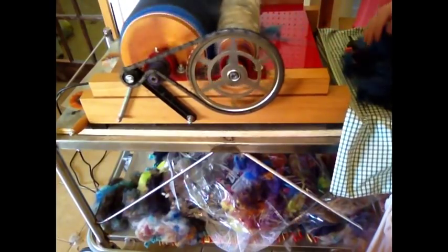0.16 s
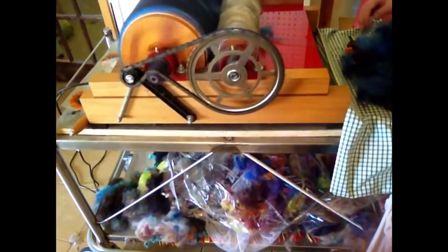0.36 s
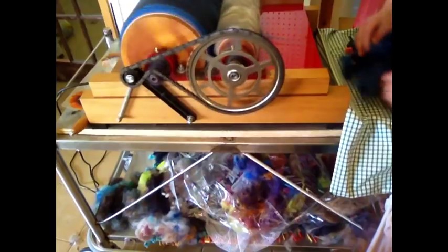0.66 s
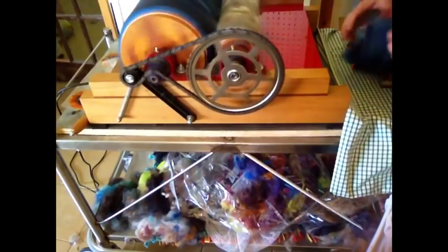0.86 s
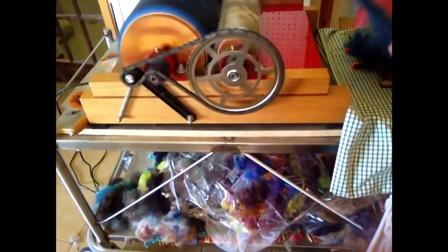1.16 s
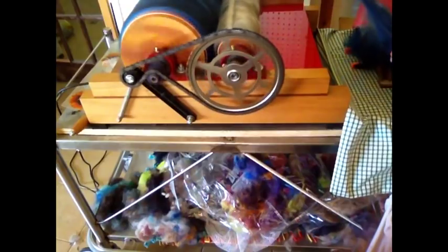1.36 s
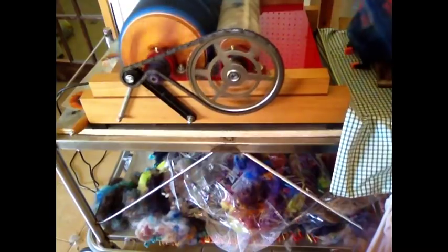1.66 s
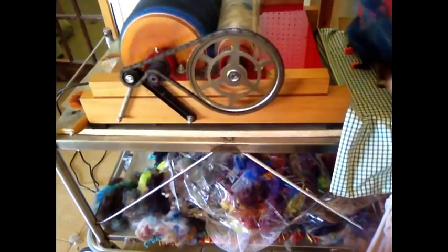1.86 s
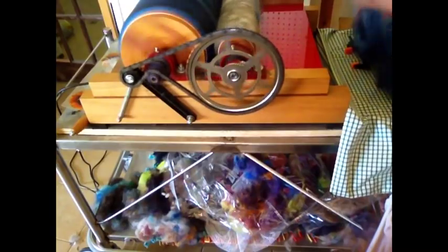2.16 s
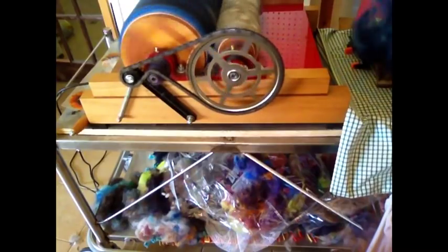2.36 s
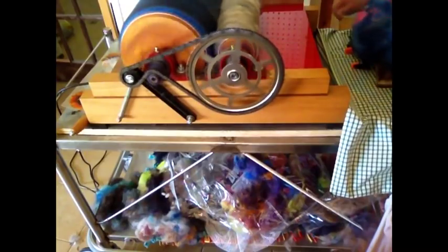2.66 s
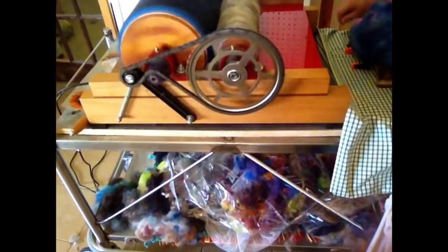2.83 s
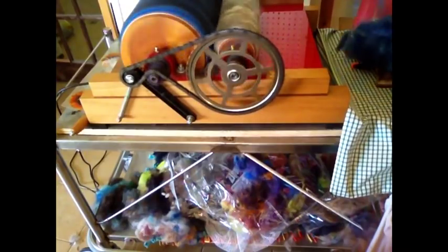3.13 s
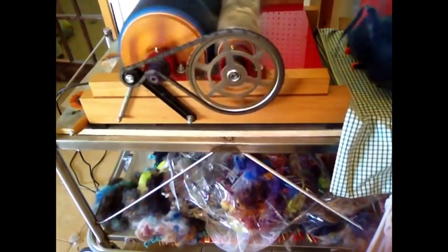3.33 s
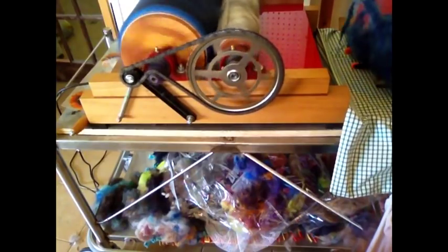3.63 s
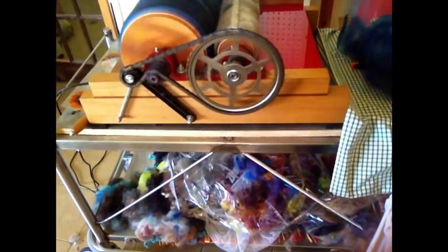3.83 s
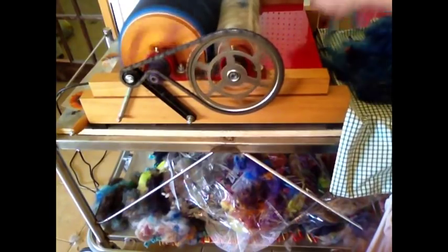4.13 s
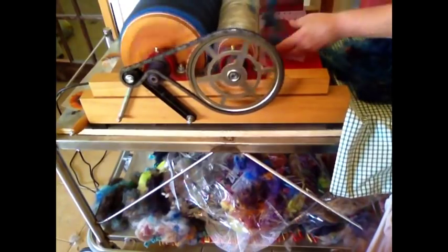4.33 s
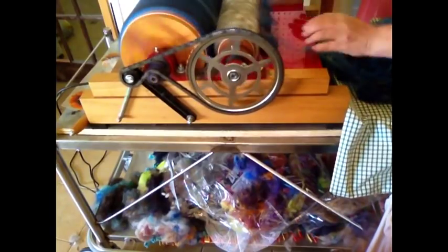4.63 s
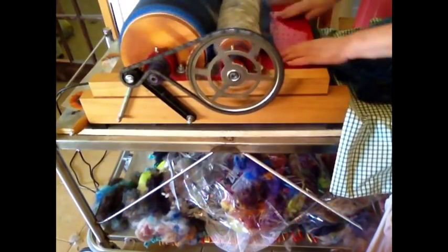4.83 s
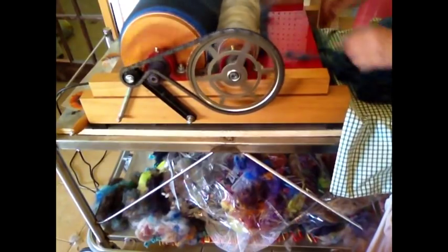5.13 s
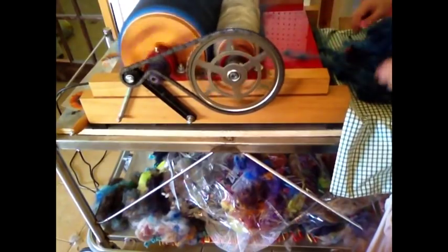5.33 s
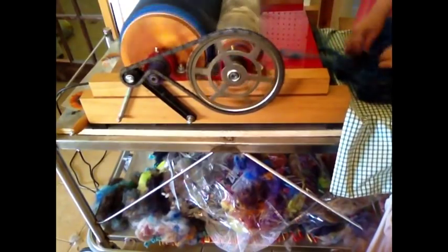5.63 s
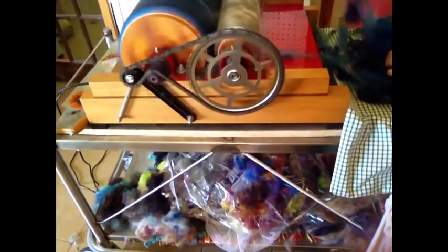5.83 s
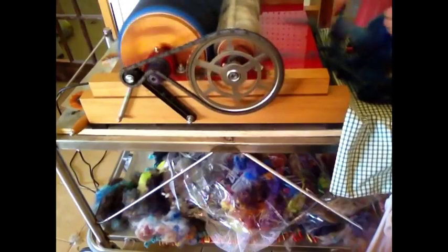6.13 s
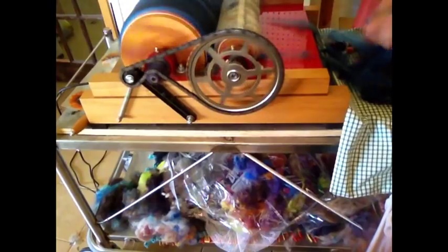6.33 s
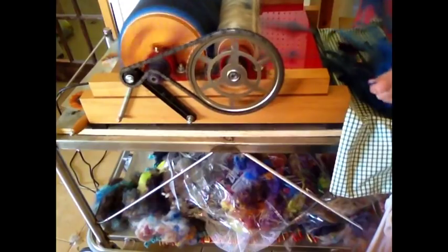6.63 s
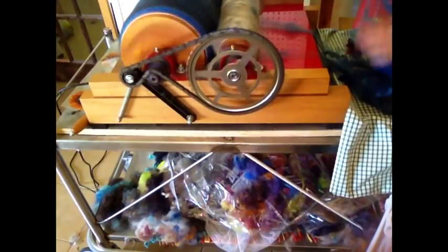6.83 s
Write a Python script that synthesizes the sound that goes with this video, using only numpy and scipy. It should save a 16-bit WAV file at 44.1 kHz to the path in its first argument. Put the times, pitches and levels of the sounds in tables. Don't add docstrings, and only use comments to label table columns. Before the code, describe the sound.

Continuous nasal motor hum with rough brushing of wire teeth and a busy, dry metallic chain rattle. First comes fibre dragged on wood with a hard knock on the table, then several seconds of uneven clunks, slaps and regular crisp ticks. Near the end a short tearing snap, two clusters of wooden bumps and gritty strokes. Close small microphone, short indoor reflections, little bass.

```python
import sys
import numpy as np
from scipy import signal
from scipy.io import wavfile
from scipy.ndimage import uniform_filter1d

SR = 44100
rng = np.random.default_rng(int(sys.argv[2]) if len(sys.argv) > 2 else 0)


def undo_db(level):
    steps = np.asarray(level, float) / 20
    return 10 ** steps


def generate_wav(sig):
    pcm = np.round(np.clip(np.atleast_2d(sig).T, -1, 1) * 32767).astype(np.int16)
    wavfile.write(sys.argv[1], SR, pcm)


N = 307818

TEETH = 8
# (time [s], tooth before [dB], tight tooth [dB], tooth after [dB])
SPROCKET_TURNS = [(0.1116, -37.5, -41.5, -78), (0.5483, -72, -37, -70), (0.9628, -70, -38, -64.5),
                  (1.387, -79, -32.5, -50), (1.803, -72, -52, -50.5), (2.2174, -70, -38, -45),
                  (2.6295, -70, -43, -39.5), (3.041, -52, -43.5, -45.5), (3.456, -72, -34.5, -43),
                  (3.8653, -47, -43, -37), (4.278, -50, -43, -44), (4.6916, -51, -37, -46),
                  (5.1022, -51, -37, -53), (5.5154, -70, -39.5, -48), (5.927, -56, -38.5, -42),
                  (6.3593, -70, -37, -42), (6.7995, -68, -40.5, -51)]


def read(points, hz):
    f, value = np.transpose(points)
    return np.interp(np.log(hz + 1), np.log(f + 1), value)


def evened(x):
    return x / np.sqrt(np.mean(x ** 2) + 1e-20)


def drift(rate_hz):
    t = np.arange(0, N + 256, 256) / SR
    rates = rate_hz * np.geomspace(.05, 1, num=24)
    waves = sum(np.sin(2 * np.pi * (f * t + rng.random())) / np.sqrt(f) for f in rates)
    return np.interp(np.arange(N) / SR, t, evened(waves))


def ring(x, hz, width):
    r = np.exp(-np.pi * width / SR)
    return 2 * signal.lfilter([1 - r], [1, -r * np.exp(2j * np.pi * hz / SR)], x).real


def resonate(x, hz, width):
    turn = np.exp(2j * np.pi * np.cumsum(hz * np.ones(len(x))) / SR)
    r = np.exp(-np.pi * width / SR)
    return 2 * (turn * signal.lfilter([1 - r], [1, -r], x / turn + 1e-18)).real


def band(x, lo_hz, hi_hz):
    return evened(signal.sosfilt(signal.butter(2, [lo_hz, hi_hz], "band", fs=SR, output="sos"), x))


def struck(rows, share, modes, rattle_s, rough=1):
    s, db, rel_db = np.transpose(rows)
    blows = np.zeros(N)
    blows[(s * SR).astype(int)] = undo_db(db + share * rel_db)
    fade = np.exp(-np.arange(2000) / (rattle_s * SR))
    rattle = signal.oaconvolve(blows, fade / np.linalg.norm(fade))[:N] * rng.standard_normal(N)
    contact = (1 - rough) * blows + rough * rattle
    out = np.zeros(N)
    for hz, width, db in modes:
        rung = ring(ring(contact, hz, width), hz, 3 * width)
        out += undo_db(db) * rung * SR / (2 * np.pi * width)
    return out


def room(x):
    # (frequency [Hz], t60 [s])
    decay = [(200, 0.34), (1500, 0.11), (12000, 0.19)]
    out = np.zeros(N)
    turn = 2 * np.pi * 1.3 * np.arange(N) / SR
    for k in range(3):
        taps = np.zeros(SR // 2)
        at = np.arange(200, len(taps) - 20, 20)
        taps[at + rng.integers(0, 20, len(at))] = rng.choice([-1., 1.], len(at))
        hz, t, z = signal.stft(taps, SR, nperseg=256)
        tail = signal.istft(z * undo_db(-60 * t / read(decay, hz)[:, None]), SR, nperseg=256)[1]
        share = np.sqrt(2 / 3) * np.cos(turn + k * np.pi / 3)
        out += signal.fftconvolve(x * share, tail / np.linalg.norm(tail))[:N]
    return out


def motor():
    mains_hz, shaft_hz = 120.04, 28.87
    tones = [(0, 3), (0, 4), (1, 0), (0, 5), (1, 1), (0, 6), (1, 2), (0, 7), (1, 3), (2, 0), (0, 9), (2, 1),
             (0, 10), (0, 11), (2, 4), (3, 0), (3, 1), (4, 0), (5, 0), (6, 0)]
    tones_db = [-107, -82, -70.5, -72.5, -71, -64.5, -68.5, -101, -63, -50, -62, -64, -68, -60.5, -57.5,
                -57, -60, -99, -53.5, -71.5]
    frame_hz = [175, 205, 238, 266, 314, 353, 395, 425, 500, 600, 965, 1066, 1203, 1378, 1545, 1790]
    # (width [Hz], level [dB])
    frame = [(10.3, -72), (9.7, -69), (20.5, -56.5), (13.5, -56.5), (14.9, -70), (16.9, -64.5),
             (16.3, -54.5), (26, -72.5), (62, -68), (51, -58), (49, -63.5), (37.5, -63.5), (53.5, -60),
             (25, -85), (37.4, -64), (72.5, -61)]
    # (time [s], level [dB])
    upper_swell = [(0, -11), (.15, -2), (.4, -6), (.7, -2), (1.2, 2.5), (2.6, 1), (3.3, -0.5), (4.3, 0.5),
                   (4.95, 2.5), (5.45, 2.5), (5.8, -1.5), (6.1, -1), (6.25, -9), (6.45, 1), (6.65, -2), (6.98, -1)]
    t = np.arange(N) / SR
    shaft = np.cumsum(shaft_hz * (1 + .0006 * drift(2))) / SR
    upper_swell_db = np.interp(t, *np.transpose(upper_swell))
    out = np.zeros(N)
    for (m, k), db in zip(tones, tones_db):
        turns = m * mains_hz * t + k * shaft + rng.random()
        waver = drift(22)
        if m > 2:
            sway_db = upper_swell_db + (3.5 if m == 3 else 1.8) * waver
        else:
            sway_db = .8 * waver
        out += np.sqrt(2) * undo_db(db + sway_db) * np.sin(2 * np.pi * turns)
    shake = rng.standard_normal(N) * (1 + .3 * np.cos(2 * np.pi * shaft))
    for hz, (width, db) in zip(frame_hz, frame):
        out += undo_db(db + 2.0 * drift(8.3)) * evened(ring(ring(shake, hz, width), hz, 3 * width))
    return out


def whirr():
    # (frequency [Hz], level [dB per Hz])
    spectrum = [(20, -70), (100, -39), (180, -23.5), (400, -4), (640, -12), (700, -15.5), (950, -15),
                (1800, -14.5), (2400, -18.5), (3000, -25.5), (5000, -29.5), (12000, -33), (13200, -33.5),
                (15500, -36)]
    # (frequency [Hz], depth [dB])
    catch = [(500, 0), (900, 2.3), (2500, 2.3), (5000, .6)]
    frames, hz = N // 128 + 5, np.fft.rfftfreq(512, 1 / SR)
    a, b, patches = rng.standard_normal((frames, 257, 3)).T
    patches = uniform_filter1d(patches, size=8, axis=0)
    patches = evened(uniform_filter1d(patches, size=7, axis=1))
    gaps = evened(uniform_filter1d(patches[:40].mean(axis=0), size=3))
    db = read(spectrum, hz)[:, None] + .9 * patches + read(catch, hz)[:, None] * gaps
    noise = signal.istft((a + 1j * b) * undo_db(db), nperseg=512, noverlap=384)[1][:N]
    return undo_db(-51 + 1.1 * drift(1.78)) * evened(noise)


def rollers():
    link_hz = 19.395
    # (share of a link pitch, level [dB])
    landings = [(.1, 0), (.44, -4), (.7, 0)]
    # (frequency [Hz], width [Hz], level [dB])
    casing = [(965, 140, -3), (1200, 250, -1), (1380, 90, -5), (1550, 220, -1), (1790, 200, 0),
              (2280, 250, -4), (3470, 300, -11)]
    # (time [s], level [dB])
    tension = [(1.1, -48), (1.66, -50), (1.93, -62), (2.79, -52.5), (3.34, -47), (3.72, -54), (3.99, -45),
               (4.28, -46), (4.43, -66), (4.62, -51), (4.74, -61), (5.02, -46), (5.15, -56), (5.86, -44),
               (6.0, -61)]
    link = np.arange(int(N / SR * link_hz) - 1)[:, None]
    place, db = np.transpose(landings)
    late, luck = rng.standard_normal((len(link), len(landings), 2)).T
    seated_s = (link + place + .02 * late.T) / link_hz
    seated_db = db + 4 * np.minimum(luck.T, 1.3)
    loose_s = rng.uniform(0, N / SR - .01, 900)
    loose_db = -16 + 4.5 * np.minimum(rng.exponential(1, 900), 3.5)
    s = np.r_[seated_s.ravel(), loose_s]
    rows = np.c_[s, np.r_[seated_db.ravel(), loose_db], np.zeros(len(s))]
    taps = struck(rows, 0, casing, .0015, .6)
    return undo_db(-9.0 + np.interp(np.arange(N) / SR, *np.transpose(tension))) * evened(taps)


def slaps():
    # (time [s], peak level [dB], ring [Hz])
    hits = [(1.105, -39, 1180), (1.287, -31.5, 1530), (1.49, -35, 1060), (1.632, -39, 1380),
            (1.91, -36, 1190), (1.995, -36, 1060), (2.096, -53, 900), (2.115, -33.5, 1080),
            (2.407, -43, 950), (2.457, -36, 920), (2.529, -33.5, 1540), (2.869, -36, 965), (2.92, -36, 990),
            (5.363, -33, 934), (2.94, -32.5, 1030), (2.993, -34.5, 1470), (3.046, -36, 1340),
            (3.091, -49, 1870), (3.149, -39, 1920), (3.178, -34, 974), (3.23, -40, 1780),
            (3.283, -37.5, 970), (3.56, -33.5, 1550), (3.593, -38.5, 980), (3.642, -37, 990),
            (3.799, -33.5, 990), (4.111, -35, 1010), (4.588, -33, 1060), (4.642, -35.5, 1550),
            (4.695, -39, 1100), (4.934, -45, 1480), (5.001, -31.5, 1430), (5.059, -33, 1580),
            (5.238, -47, 895), (5.394, -33, 1060), (5.701, -48, 1780), (5.828, -32.5, 1510),
            (0.694, -35, 927), (4.777, -34, 930), (6.808, -33.5, 1535), (6.855, -34, 1190),
            (6.856, -41, 1810), (6.908, -34, 1930), (6.943, -35, 980), (6.58, -35, 1460),
            (6.585, -47, 2250)]
    t60 = 0.038
    out, t = np.zeros(N + SR), np.arange(3000) / SR
    for s, db, hz in hits:
        grit = band(rng.standard_normal(len(t)), 700, 1950)
        neighbour = np.sin(2 * np.pi * 1.37 * hz * t) * undo_db(-60 * t / t60)
        tone = np.sin(2 * np.pi * hz * t) + .5 * neighbour
        swell = undo_db(db - 4 - 60 * t / t60) * (1 - np.exp(-t / 0.00079))
        out[round(s * SR):][:len(t)] += swell * (tone + 0.67 * grit)
    return out[:N]


def links():
    seat = .67
    s = np.transpose(SPROCKET_TURNS)[0]
    at = np.interp(np.arange(TEETH * (len(s) - 1)) + seat, TEETH * np.arange(len(s)), s)
    late, luck, low = rng.standard_normal((len(at), 3)).T
    return np.c_[at + .0015 * late, -43.5 + 3.5 * luck, -1.5 + 3 * low]


def teeth():
    # (time [s], level [dB])
    jolt = (.5796, -26)
    s, *db = np.transpose(SPROCKET_TURNS)
    pitch_s = np.gradient(s) / TEETH
    at = np.r_[s - pitch_s, s, s + .96 * pitch_s, jolt[0]]
    db = np.r_[np.ravel(db), jolt[1]]
    return np.c_[at, db, -10 - 0.46 * (db + 38)]


def chain():
    # (time [s], peak level [dB], share of the lower ring [dB])
    hard_ticks = [(.166, -39, -6), (.5502, -27, 0), (.612, -32, 12), (1.106, -32, -15), (1.1573, -33, 2),
                  (1.2103, -31.5, -6), (1.705, -39.5, 14), (1.8033, -37, -8), (2.357, -40.5, 9),
                  (2.5265, -39, 15), (2.6638, -42, -13), (2.716, -39, 10), (2.8689, -41, -20),
                  (3.3518, -35.5, 10.5), (3.698, -35, -13), (3.7475, -32, 1), (3.9042, -47.5, 16),
                  (4.1091, -37, -2), (4.6215, -37, 1), (4.7262, -38, 3), (4.777, -40, 4), (5.002, -36, 2),
                  (5.24, -33.5, -20), (5.3408, -35.5, -7), (5.7526, -30, -7), (6.092, -32, -4),
                  (6.137, -40, -12), (6.1447, -25, -8), (6.181, -30, -1), (6.789, -35, 4)]
    # (time [s], peak level [dB], share of the lower ring [dB])
    light_ticks = [(1.3159, -51, -1), (1.6841, -43.5, -1), (1.7365, -43, -1), (2.1534, -42.5, 12),
                   (2.2543, -50, -4), (2.4076, -52, 17), (2.7676, -44, -4), (2.9724, -40, -1),
                   (3.1787, -44, 13), (3.2301, -44, -6), (3.3333, -60, -2), (3.5604, -48, -4),
                   (3.6436, -63, -4), (3.7993, -68, -2), (4.213, -43, 2), (4.4687, -55, -4),
                   (4.5211, -46, -6), (4.5725, -43, -9), (4.8279, -46, 6), (4.9831, -62, -4),
                   (5.0878, -56, -1), (5.291, -56, -7), (5.4465, -48, 1.5), (5.6496, -59, -4),
                   (5.8048, -42, -1), (5.8591, -41, 8), (5.9105, -47, -2), (5.9614, -47, -2),
                   (6.013, -39, 2), (6.2906, -38, -4), (6.346, -51, -4)]
    # (time [s], peak level [dB], share of the table [dB])
    shaft_knocks = [
        (1.233, -37.5, 1),
        (1.759, -34, -3),
        (2.276, -34, 1),
        (2.79, -42, 4),
        (3.303, -40, 5.5),
        (3.821, -32, -1),
        (4.336, -33.5, -3.5),
        (4.851, -32.5, -4),
        (5.363, -40, 4.5),
        (5.881, -32.5, 2),
    ]
    # (time [s], peak level [dB])
    clunks = [(1.288, -54), (1.527, -42.5), (1.996, -40), (2.097, -46), (2.15, -41.5), (2.51, -39),
              (2.868, -51), (2.922, -34), (2.991, -46), (3.129, -41), (3.179, -59), (3.403, -42.5),
              (3.642, -56), (4.005, -39.5), (4.212, -41), (4.417, -44), (4.508, -41), (4.573, -56),
              (5.053, -41), (5.187, -39.5), (5.649, -40), (5.826, -41), (5.86, -46)]
    # (frequency [Hz], width [Hz], level [dB])
    tick_high = [(2300, 500, -1), (2850, 600, -1), (3480, 310, -2.5), (3950, 500, -6), (4600, 900, -12),
                 (6300, 2500, -17)]
    # (frequency [Hz], width [Hz], level [dB])
    tick_low = [(1380, 200, -3), (1790, 250, 0), (2250, 300, -3)]
    # (frequency [Hz], width [Hz], level [dB])
    knock_ring = [(960, 90, 0), (1150, 250, -7), (1100, 1100, 1)]
    # (frequency [Hz], width [Hz], level [dB])
    knock_table = [(390, 100, -1), (500, 160, -3)]
    blows = np.r_[shaft_knocks, np.c_[clunks, np.zeros(len(clunks))]]
    snap_ticks = teeth()[:-1] * [1, 1, 0] + [0, -3.5, 5]
    seats = np.r_[hard_ticks, np.add(light_ticks, [0, 3, 0]), links(), snap_ticks]
    jarred = np.r_[seats, blows * [1, 1, 0] + [0, -1, 0]]
    ticks = undo_db(-1) * struck(seats, 0, tick_high, .004, .4)
    ticks += undo_db(-3) * struck(jarred, 1, tick_low, .004, .4)
    knocks = undo_db(4.5) * struck(blows, 0, knock_ring, .001, .15)
    knocks += undo_db(5) * struck(blows, 1, knock_table, .001, .15)
    knocks = signal.sosfilt(signal.butter(2, 2000, fs=SR, output="sos"), knocks)
    return ticks - knocks + slaps() + rollers()


def sprocket():
    # (frequency [Hz], width [Hz], level [dB])
    snap_high = [(11140, 770, -6), (11700, 380, -1), (12030, 400, -8), (12380, 310, -3), (13900, 900, -24)]
    # (frequency [Hz], width [Hz], level [dB])
    snap_mid = [(2700, 900, -9), (3700, 1000, -7), (4600, 1200, -4), (5600, 1200, -2), (6470, 1000, -4),
                (7700, 1500, 0), (9000, 1500, -1)]
    rows = teeth()
    fizz = undo_db(3.5) * struck(rows, 0, snap_high, 0.0082, 0.86)
    return fizz + undo_db(12.5) * struck(rows, 0.94, snap_mid, 0.012, 0.93)


def wool():
    # (peak time [s], level [dB], rise [s], fall [dB per s], scrape resonance [Hz])
    drags = [(.21, -41, 0.44, 96, 1280), (.4, -40.5, 0.018, 20, 1150), (.464, -33.5, 0.057, 64, 1200),
             (0.563, -35.5, 0.1, 90, 1620), (0.779, -37, 0.032, 147, 1520), (.87, -41.5, 0.27, 44, 1500),
             (.965, -40, 0.012, 90, 1410), (1.03, -43, .05, 80, 1450), (1.276, -47.5, 0.061, 34, 1390),
             (1.864, -48, 1, 604, 1340), (3.364, -46, 0.034, 45, 1190), (6.04, -41.5, 0.028, 70, 1400),
             (6.15, -36, 0.02, 98, 1570), (6.2, -38, 0.13, 122, 1410), (6.42, -43.5, 0.57, -1, 1470),
             (6.57, -42.5, 0.17, 90, 1550), (6.684, -39, .006, 40, 1480), (6.84, -47, 0.11, 110, 1500)]
    # (middle time [s], level [dB], half length [s])
    brushes = [(0.183, -61, 0.16), (0.472, -62, 0.08), (0.555, -49, .015), (0.622, -51, 0.028),
               (0.805, -59.5, 0.065), (0.997, -67, 0.09), (1.414, -64.5, 0.5), (3.4, -80, .1),
               (6.08, -75, .05), (6.14, -64, 0.0089), (6.202, -61, 0.033), (6.49, -61, 0.11),
               (6.772, -66, 0.077)]
    # (time [s], level [dB], centre [Hz])
    tuft = [
        [(5.7, -66, 4560), (5.722, -57, 4600), (5.73, -45, 4550)],
        [(5.73, -54, 4700), (5.78, -57, 5160), (5.785, -59, 4920)],
    ]
    # (time [s], level [dB], unused share [dB])
    tuft_snap = [
        (5.7743, -33.5, 0),
    ]
    t = np.arange(N) / SR
    s, peak_db, rise_s, fall_db, stroke_hz = np.transpose(drags)[:, :, None]
    strokes = peak_db + np.minimum(11.5 * (t - s) / rise_s, fall_db * (s - t))
    lift_db = 5.5 * np.clip((t - 6.8) / 0.073, 0, 1)
    drag_db = strokes.max(axis=0) - lift_db
    scrape_hz = uniform_filter1d(stroke_hz[strokes.argmax(axis=0), 0], size=1500)

    grain = evened(uniform_filter1d(rng.standard_normal(N), size=130))
    slips = rng.standard_normal(N) * undo_db(1.8 * grain)
    squeal = evened(resonate(slips, scrape_hz, 120)) + 0.3 * evened(ring(slips, 2050, 134))
    body = 1.05 * evened(resonate(slips, scrape_hz, 470)) + 1.18 * band(slips, 770, 1760)
    scrape = evened(0.41 * squeal + body)
    rumble = undo_db(-10.5) * band(slips, 434, 860)
    swells = sum(undo_db(db) * np.exp(-((t - at) / half) ** 2) for at, db, half in brushes)
    hiss = swells * band(slips, 800, 11000)

    s, db, hz = np.vstack(tuft).T
    centre_hz = np.interp(t, s, hz)
    pull = evened(resonate(band(rng.standard_normal(N), 4100, 5400), centre_hz, 1300))
    pull += 0.42 * band(slips, 5800, 7800)
    tearing = undo_db(np.interp(t, s, db, -120, -120)) * pull
    snap_modes = [(6900, 690, 3.0), (5900, 700, -4), (4600, 800, -6)]  # Hz, width Hz, dB
    snap = struck(tuft_snap, 0, snap_modes, 0.0014)
    return undo_db(drag_db) * (scrape + rumble) + hiss + tearing + snap


def bumps():
    # (time [s], peak level [dB], low ring [Hz], share of the high ring [dB], high ring [Hz])
    hits = [(0.5486, -15.5, 368, -11, 1570), (.554, -20, 385, -9, 920), (0.569, -23, 333, -26, 1070),
            (.576, -22, 368, -18, 1100), (0.611, -32, 333, -6, 970), (.632, -32.5, 290, -20, 1200),
            (4.021, -31.5, 278, -29, 1130), (6.13, -18.5, 620, -21, 850), (6.13, -23.5, 423, -23, 1350),
            (6.141, -25, 434, -16, 1630), (6.161, -26.5, 349, -9, 1450), (6.422, -30.5, 520, -8, 1100),
            (6.683, -21.5, 407, 1.5, 1720), (6.689, -28.5, 480, 3, 1210), (6.702, -19.5, 568, -6, 1730),
            (6.728, -22.5, 416, -8, 1610), (6.747, -26, 386, -14, 1700), (6.781, -34, 400, -6, 810),
            (6.962, -32, 404, -18, 1000)]
    # (time [s], peak level [dB], frequency [Hz], t60 [s])
    booms = [
        (0.577, -39.5, 147, 0.25),
        (0.602, -38, 212, 0.33),
        (4.019, -34, 170, 0.076),
        (6.143, -38, 194, 0.21),
        (6.692, -34, 204.6, 0.51),
    ]
    out, t = np.zeros(N + SR), np.arange(SR // 2) / SR
    for s, db, low_hz, rel_db, high_hz in hits:
        t60 = 17.4 / low_hz
        shudder = undo_db(-21 - 60 * t / 0.4) * band(rng.standard_normal(len(t)), 490, 835)
        low = np.sin(2 * np.pi * low_hz * t * (1 - t))
        low += .3 * band(rng.standard_normal(len(t)), 500, 1200)
        low *= undo_db(-60 * t / t60) * (1 - np.exp(-t / 0.0019))
        rough = evened(ring(ring(rng.standard_normal(len(t)), high_hz, 170), high_hz, 1400))
        first_ring = np.sin(2 * np.pi * high_hz * t) * undo_db(-90 * t / t60)
        crunch = .6 * rough + first_ring
        crunch *= undo_db(rel_db - 60 * t / t60) * (1 - np.exp(-t / 0.00042))
        out[round((s + .002) * SR):][:len(t)] += undo_db(db) * (low + crunch + shudder)
    for s, db, hz, t60 in booms:
        swell = undo_db(db - 60 * t / t60) * (1 - np.exp(-t / 0.013))
        out[round(s * SR):][:len(t)] += swell * np.sin(2 * np.pi * hz * t)
    return out[:N]


def scene():
    drive, snaps = chain(), sprocket()
    hands = bumps() + wool()
    wet = room(undo_db(-2.5) * drive + undo_db(-5.0) * snaps + undo_db(-6.5) * hands)
    return (motor() + whirr() + drive + snaps + hands + wet)[None]


def band_limit(x):
    return signal.sosfilt(signal.butter(12, 16160, fs=SR, output="sos"), x)


def record(dry):
    thin = signal.sosfilt(signal.butter(2, 90, "high", fs=SR, output="sos"), dry)
    edge = signal.firwin(401, 15350, window=("kaiser", 7), fs=SR)
    mix = signal.oaconvolve(thin, edge[None], "same")
    return band_limit(mix)


dry = scene()
out = record(dry)
generate_wav(out)
```